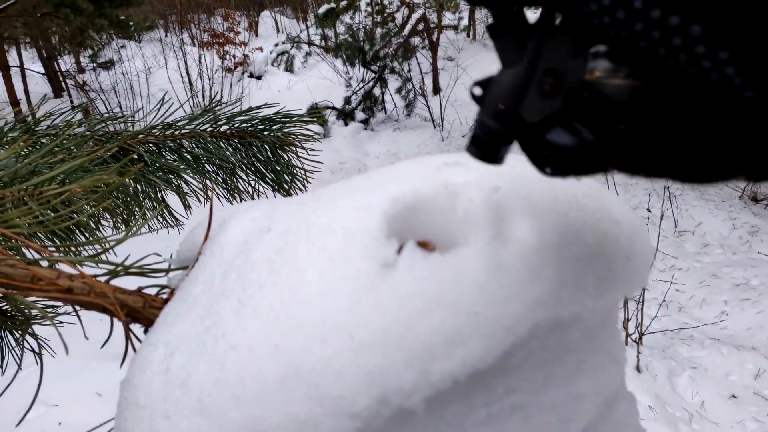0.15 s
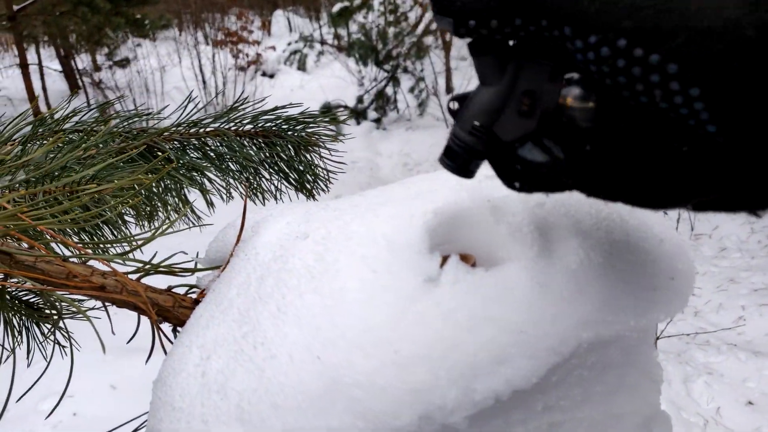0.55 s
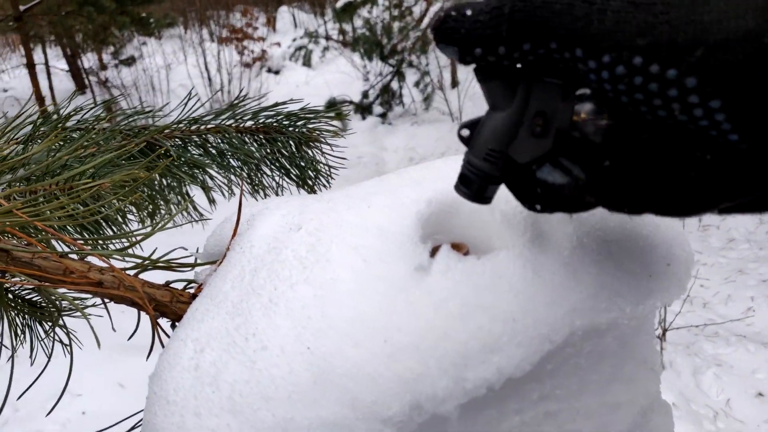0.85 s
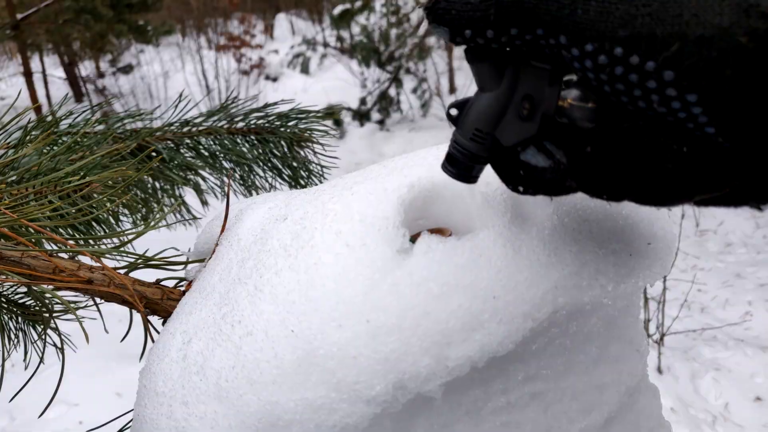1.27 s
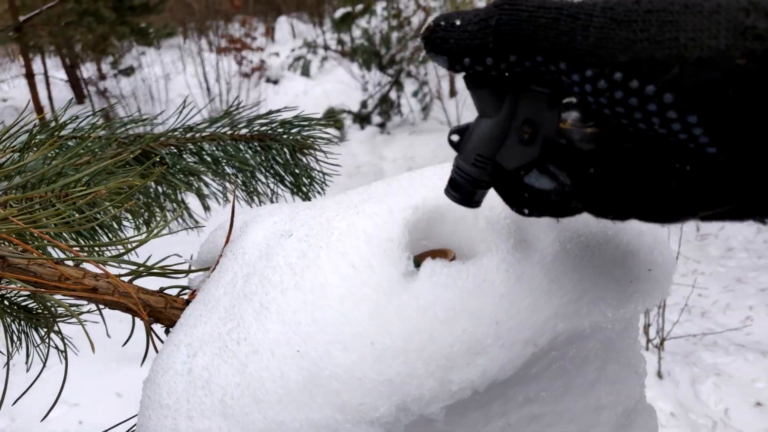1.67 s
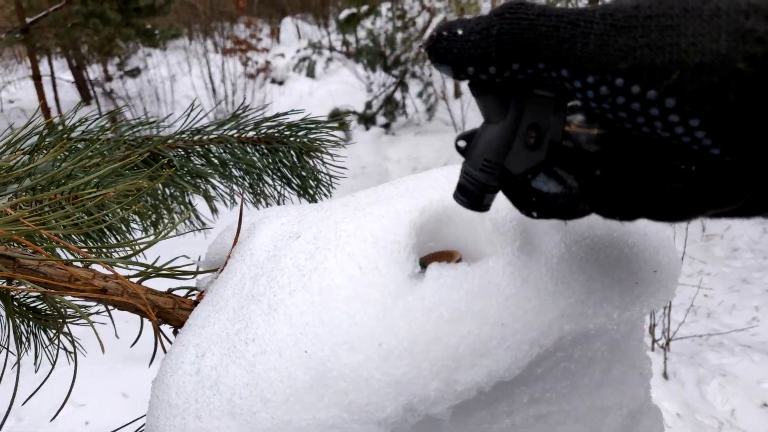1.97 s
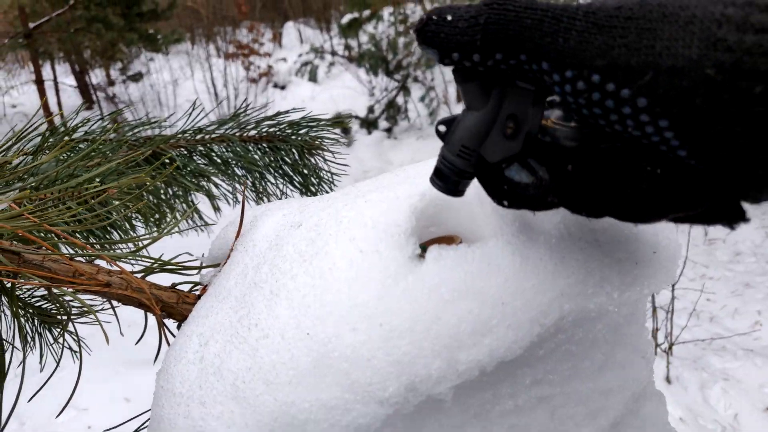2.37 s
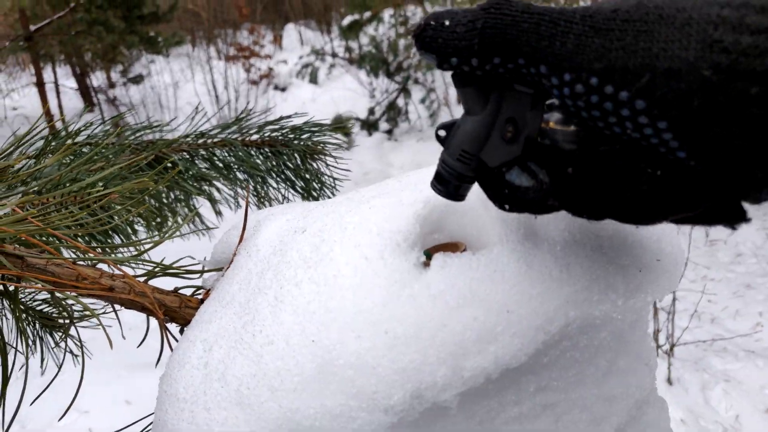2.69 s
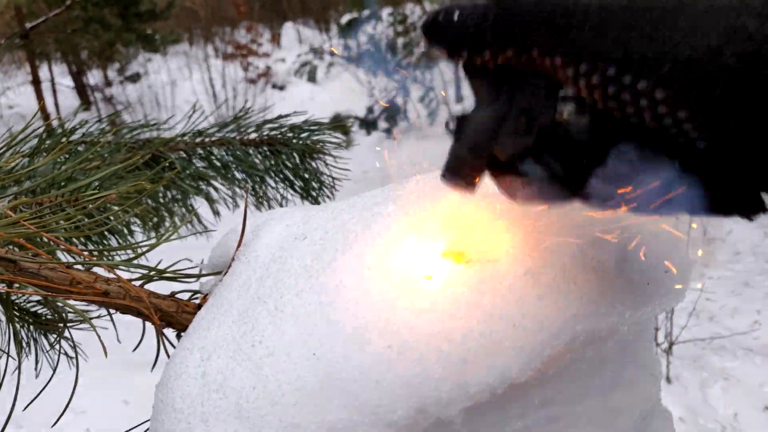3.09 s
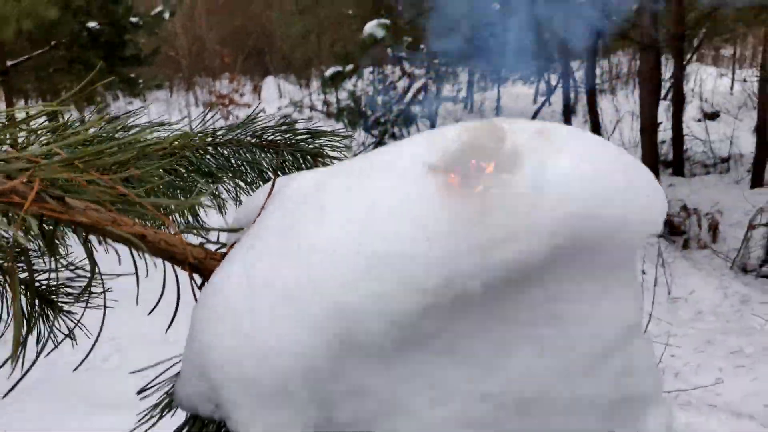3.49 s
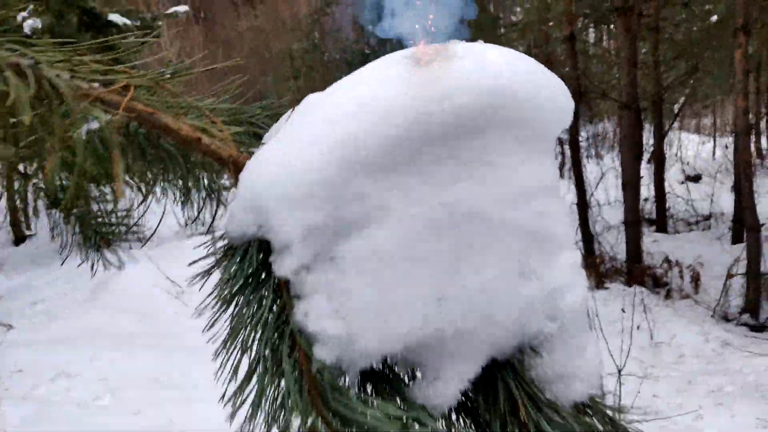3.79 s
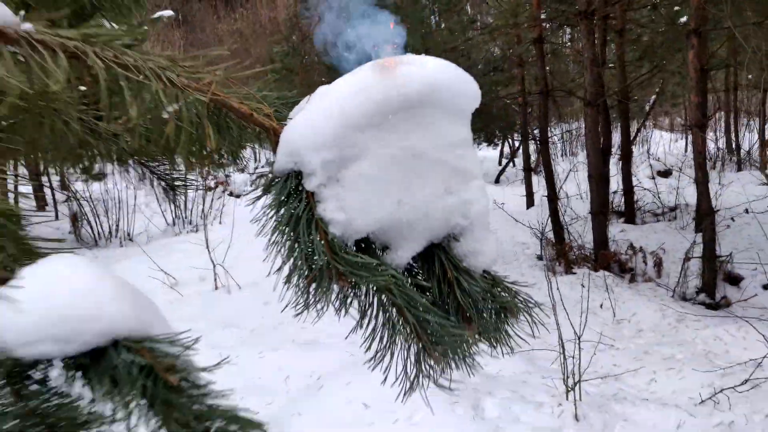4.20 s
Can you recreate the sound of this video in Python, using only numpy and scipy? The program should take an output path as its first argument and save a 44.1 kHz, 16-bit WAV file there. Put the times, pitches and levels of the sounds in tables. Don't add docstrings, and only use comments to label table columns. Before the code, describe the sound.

A lighter snaps sharply over distant forest wind, then a fuse flares into a rough hiss, sputters and fades as footsteps press snow.

```python
import sys
import numpy as np
from scipy import signal
from scipy.fft import rfft, irfft, next_fast_len
from scipy.io import wavfile
from scipy.ndimage import uniform_filter1d, map_coordinates

SR = 44100
rng = np.random.default_rng(int(sys.argv[2]) if len(sys.argv) > 2 else 0)


def wrap_up_sound(samples):
    columns = np.atleast_2d(samples).T
    tamed = np.clip(columns, -1, 1)
    steps = np.round(tamed * 32767).astype(np.int16)
    wavfile.write(sys.argv[1], SR, steps)


def undo_db(level):
    steps = np.asarray(level, float) / 20
    return 10 ** steps


N = 191760
T = np.arange(N) / SR
SIZE = next_fast_len(N + 4096)
HZ = np.arange(SIZE // 2 + 1) * SR / SIZE + 1e-9

# frequency in Hz, density in dB per Hz.
WIND_COLOUR = [(13, -34.5), (22, -3.5), (38, -4), (60, -15), (195, -4.5), (228, -5.5), (435, -2),
               (634, -2.5), (793, -3.5), (947, -4.5), (1130, -10), (2020, -25.5), (2820, -36.5),
               (4500, -49.5), (5850, -74), (9900, -120)]
# frequency in Hz, density in dB per Hz.
FUSE_COLOUR = [(50, -20), (115, -7), (300, -2), (700, -2.5), (1500, -9), (2500, -13), (4000, -19.5),
               (5500, -26.5), (8000, -31.5), (10000, -29.5), (12000, -25.5), (14000, -25.5), (16000, -19)]
# start in seconds, peak in dB, pitch in Hz,
# left minus right in dB, share of broad crackle.
TICKS = [
    (.0464, -38.5, 2450, 3, 0.4),
    (.136, -68, 7500, -4, .6),
    (0.152, -62, 6060, 2, 6.5),
    (3.28, -31.5, 2800, -6, .5),
]
# start in seconds, peak in dB, pitch in Hz, length in seconds.
STEPS = [
    (3.7, -27.5, 239.7, 0.029),
    (4.013, -40, 382, 0.013),
    (4.181, -26.5, 131.5, 0.013),
    (4.263, -28, 234, 0.011),
    (4.321, -25, 257.5, 0.02),
]
# start in seconds, peak in dB, pitch in Hz, length in seconds
PUFF = (3.5, -30, 76.5, -1.3)
# mode in Hz, left in dB, right in dB, t60 in seconds.
BODY_MODES = [(2180, -26, -30, 0.0078), (3370, -8.5, -5.5, 0.0059), (2840, -25, -20, 0.026),
              (4030, -22, -14, 0.0049), (5600, -18.5, -35, 0.013), (7920, -29, -26.5, 0.013),
              (10660, -26, -12.5, 0.0032), (13400, -35, -17, 0.0021), (15300, -30.5, -13, .003)]
# pitch in Hz, level in dB, t60 in seconds.
GLOVE_THUD = [(150, -24.5, 0.034), (309, -18.5, 0.02)]
# peak in seconds, dB over the steady burn, swell in seconds, dying in seconds.
FLARES = [
    (3.11, 6.4, .15, .07),
    (3.39, 1.3, .04, 0.081),
]
# cavity in Hz, width in Hz, duct in Hz, width in Hz, duct level in dB,
# shadow in Hz, width in Hz, shadow depth from 0 to 1.
PORTS = [
    (6570, 770, 15600, 1900, -4.5, 6500, 1500, 0.11),
    (7850, 850, 15300, 2700, -12, 6750, 2000, 0.3),
]
# frequency in Hz, density in dB per Hz.
CAPSULE_NOISE = [(20, 4), (2000, 2), (3500, -4), (5000, 1), (10000, -1), (13000, -0.5), (16000, 0)]
# frequency in Hz, density in dB per Hz.
CRUNCH_COLOUR = [(300, -23), (900, 3), (3000, -12), (5000, -31)]
CRUST_COLOUR = [(600, -12), (1800, 1), (4000, -7), (7000, -29)]
GAS_COLOUR = [(2500, -30.5), (5000, -6.0), (6800, -3), (9000, -7), (12000, -20)]
FLAME_COLOUR = [(9000, -30.5), (12000, -15), (14000, 0.0), (16000, 1)]
SCATTER_COLOUR = [(4000, 15), (5500, -4), (9000, -9), (12000, 13)]
SPARKS_COLOUR = [(7000, -20.5), (9500, -1), (12000, 4), (15000, -10)]

SNAP_S = .51853
CATCH_S = 2.995


def shaped(x, response):
    return irfft(rfft(x, SIZE) * response, SIZE)[..., :N]


def colour(table):
    hz, db = np.transpose(table)
    return undo_db(np.interp(np.log(HZ), np.log(hz), db))


def step_up(hz):
    return 1 / (1 + (hz / HZ) ** 6)


def ramp(s, takes):
    x = np.clip((T - s) / takes, 0, 1)
    return x * x * (3 - 2 * x)


def lean(pan_db):
    return np.array([[.5], [-.5]]) * pan_db


def bell(s, lasts):
    return np.exp(-((T - s) / lasts) ** 2)


def walk(rate):
    k = int(SR / rate)
    held = np.repeat(rng.standard_normal(300)[:N // k + 1], k)
    return 1.3 * uniform_filter1d(uniform_filter1d(held, k), k)[:N]


def add(out, s, sound):
    i = int(s * SR)
    out[:, i:i + sound.shape[-1]] += sound[..., :N - i]


def resonance(f, hz, width):
    return 1 / (1 - (f / hz) ** 2 + 1j * f * width / hz ** 2)


def ports(f):
    out = []
    for hz, width, duct_hz, duct_width, duct_db, shade_hz, shade_width, depth in PORTS:
        duct = 1 + undo_db(duct_db) * (f / duct_hz) ** 2 * resonance(f, duct_hz, duct_width)
        shade = 1 - depth * 1j * f * shade_width / shade_hz ** 2 * resonance(f, shade_hz, shade_width)
        out.append(resonance(f, hz, width) * duct * shade)
    return np.array(out)


def arrive(response, right_late_s, direct, near=None):
    white = rng.standard_normal((3, 2 * len(HZ))).view(complex)
    if near is None:
        near = white[2]
    else:
        near = rfft(near, SIZE) * np.sqrt(2 / N) / near.std()
    lag = np.exp(-1j * np.pi * HZ * right_late_s)
    share = np.clip(direct, 0, 1)
    wave = near * np.array([lag.conj(), lag])
    return response * (wave * np.sqrt(share) + white[:2] * np.sqrt(1 - share))


def unit(spectra, lo, hi):
    band = slice(int(lo * SIZE / SR), int(hi * SIZE / SR))
    heard = (spectra[:, band] * ports(HZ[band])).mean(axis=0)
    return irfft(spectra, SIZE)[:, :N] * SIZE / np.sqrt(2 * np.sum(np.abs(heard) ** 2))


def drone():
    hz, width_hz, level_db, ends_s = 152, 5.4, -58, 0.9
    note = unit(arrive(resonance(HZ, hz, width_hz) * step_up(hz - 30), 0, 1.0), 120, 190)
    return note * undo_db(level_db) * (1 - ramp(ends_s, .4))


def wind():
    level_db, rise_db_per_s, right_late_s = -43, 0.5656, -0.00032
    direct = 0.98 / (1 + (HZ / 1300) ** 2) * (1 - 0.43 / (1 + (HZ / 40) ** 2))
    summed = np.sqrt((1 + direct * np.cos(2 * np.pi * HZ * right_late_s)) / 2)
    roar = rfft(unit(arrive(colour(WIND_COLOUR) / summed, right_late_s, direct), 328, 1160), SIZE)
    out = 0
    for hz in 22 * 2 ** np.arange(9):
        octave = np.maximum(1 - np.abs(np.log2(HZ / hz)), 0)
        out = out + undo_db(0.79 * walk(9.06)) * irfft(roar * octave, SIZE)[:, :N]
    return out * undo_db(level_db + rise_db_per_s * T + lean(1.2))


def steps():
    out, t = np.zeros((2, N)), np.arange(4000) / SR
    crunch = shaped(rng.standard_normal(N), colour(CRUNCH_COLOUR))
    crunch /= crunch.std()
    for k, (s, db, hz, length) in enumerate([*STEPS, PUFF]):
        swell = t / length * np.exp(1 - t / length * 2) * 2
        grit = crunch[k * len(t):(k + 1) * len(t)]
        add(out, s, undo_db(db - 10.0) * swell * (np.sin(2 * np.pi * hz * t) + 0.15 * grit))
    return out


def crust():
    breaks_s, level_db, lasts_s = 4.29, -47, 0.066
    grains = rng.standard_normal(N) * undo_db(3.4 * rng.exponential(size=N))
    crackle = unit(arrive(colour(CRUST_COLOUR), .00002, 0.77, grains), 1620, 5000)
    return crackle * undo_db(level_db) * bell(breaks_s, lasts_s)


def ticks():
    out, t = np.zeros((2, N)), np.arange(600) / SR
    chance = uniform_filter1d(rng.standard_normal((len(TICKS), len(t))), size=5)
    for (s, db, hz, pan_db, crackle), noise in zip(TICKS, chance):
        ring = np.sin(2 * np.pi * hz * t) * undo_db(-60 * t / 0.0096)
        ring = ring + crackle * noise * undo_db(-60 * t / 0.0054)
        add(out, s, ring * undo_db(db + lean(pan_db)))
    return out


def lighter():
    valve_s, opens_s, cold_db, lit_db = .33, .06, -65.5, -72
    flame_db, sinks_db_per_s, grows_s = -64, -1.5, 0.14
    sway_db, sway_period_s, sway_peak_s = 2.5, 1.2, 1.3
    near = 1 - ramp(3.4, .1)
    gas = unit(arrive(colour(GAS_COLOUR), .00005, 0.62), 5500, 8800)
    gas_db = cold_db + (lit_db - cold_db) * ramp(SNAP_S, .08)
    gas *= ramp(valve_s, opens_s) * undo_db(gas_db + 0.82 * walk(9.6))
    flame = unit(arrive(colour(FLAME_COLOUR), .00006, 0.32), 14000, 15700)
    grown = 1 - np.exp(-np.maximum(T - SNAP_S, 0) / grows_s)
    draught_db = sway_db * np.cos(2 * np.pi * (T - sway_peak_s) / sway_period_s) + 1.2 * walk(8.0)
    flame *= grown * undo_db(flame_db + sinks_db_per_s * T + draught_db + lean(3.5))
    return near * (gas + flame)


def snap():
    level_db = -1
    t = np.arange(4000) / SR
    hit = np.zeros((2, len(t)))
    crack = np.array([-1, -1, 2, 2, -1, -1]) / 5
    hit[0, :len(crack)] = undo_db(10) * crack
    add(hit[1:], 1 / SR, undo_db(-1.0) * -crack)
    for hz, left_db, right_db, t60 in BODY_MODES:
        ring = np.sin(2 * np.pi * hz * t) * undo_db(-60 * t / t60)
        hit -= undo_db(np.array([[left_db], [right_db]])) * ring
    scatter = np.diff(rng.standard_normal((2, len(t) + 1)))
    scatter = shaped(scatter, colour(SCATTER_COLOUR))[:, :len(t)]
    hit += scatter * (undo_db(-35 - 60 * t / 0.031) + undo_db(-82 - 60 * t / .15))
    hit = signal.sosfilt(signal.butter(3, 1900, "high", fs=SR, output="sos"), hit)
    hit[0] = np.roll(hit[0], 1)
    thud = sum(undo_db(db - 60 * t / t60) * np.sin(2 * np.pi * hz * t) for hz, db, t60 in GLOVE_THUD)
    thud = thud * np.minimum(t / 0.0013, 1)
    out = np.zeros((2, N))
    add(out, SNAP_S, undo_db(level_db) * (hit + thud))
    add(out, SNAP_S + 0.0026, undo_db(level_db - np.array([[24], [19]])) * hit)
    add(out, SNAP_S - .002, undo_db(-53 - 60 * t / .006)[88::-1] * scatter[:, :89])
    return out


def sparks():
    spray = unit(arrive(colour(SPARKS_COLOUR), 0, 0), 9000, 14000)
    return spray * undo_db(-50.5 + lean(7)) * bell(3.37, .085)


def fuse():
    level_db, catch_takes_s, back_off_s, fade_db_per_s = -41.5, 0.036, 3.425, -11.5
    flare_db = 0
    for s, db, swell, die in FLARES:
        flare_db = flare_db + db * bell(s, np.where(T < s, swell, die))
    away_s, burning_s = np.maximum(T - back_off_s, 0), np.maximum(T - CATCH_S, 0)
    swing = ramp(3.26, 0.23)
    turn = ramp(3.94, 0.38)
    glove_db = 9.5 * ramp(CATCH_S, 0.09) * (1 - swing)

    sizes = rng.exponential(size=N // 24 + 1).repeat(24)[:N]
    bursts = rng.standard_normal(N) * undo_db(0.9 * sizes)
    direct = 0.71 + 0.26 / (1 + (HZ / 2500) ** 2)
    burn = arrive(colour(FUSE_COLOUR), .000048, direct, bursts)
    low, mid, high = step_up(1100), step_up(4900), step_up(10000)

    roar = unit(burn * (1 - low), 100, 1200) * undo_db(5 - 0.11 * flare_db + 1.5 * walk(24.9))
    hiss = unit(burn * (low - mid), 1620, 5000) * undo_db(0.39 * walk(30))
    jet = unit(burn * (mid - high), 5000, 9300) * undo_db(-1.9 - 0.5 * flare_db + 0.5 * walk(30))
    jet *= undo_db(lean(0.35 * glove_db))
    sparkle = unit(burn * high, 12000, 16400) * undo_db(-7 - 2 * burning_s + 0.68 * walk(30.15))
    sparkle *= undo_db(lean(0.5 + glove_db - 6 * burning_s))

    treble = (jet + sparkle) * undo_db(-3.5 * turn ** 2)
    level_db = level_db + flare_db + fade_db_per_s * away_s + 0.53 * walk(40)
    left, right = (roar + hiss + treble) * ramp(CATCH_S, catch_takes_s) * undo_db(level_db)
    shift_s = (12 - 15.5 * swing - 25 * turn) * 1e-6
    right = map_coordinates(right, [(T - shift_s) * SR], order=5, mode="mirror")
    return np.array([left, right])


def scene():
    return drone() + wind() + steps() + crust() + ticks() + lighter() + snap() + sparks() + fuse()


def top_cut(x):
    return signal.sosfilt(signal.butter(12, 16520, fs=SR, output="sos"), x)


def record(dry):
    top_hz, hiss_db = 15950, -63.0
    hiss = shaped(rng.standard_normal((2, N)), colour(CAPSULE_NOISE)) * undo_db(hiss_db)
    clipped = np.clip(shaped(dry, ports(HZ)), -1, 1)
    mix = shaped(clipped + hiss, HZ < top_hz)
    return top_cut(mix)


dry = scene()
out = record(dry)
wrap_up_sound(out)
```